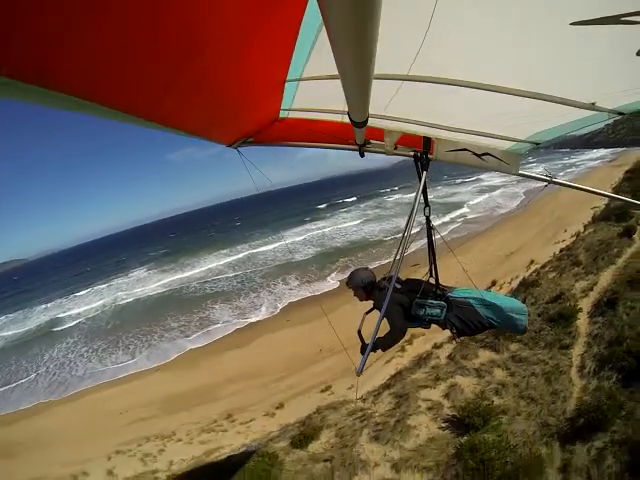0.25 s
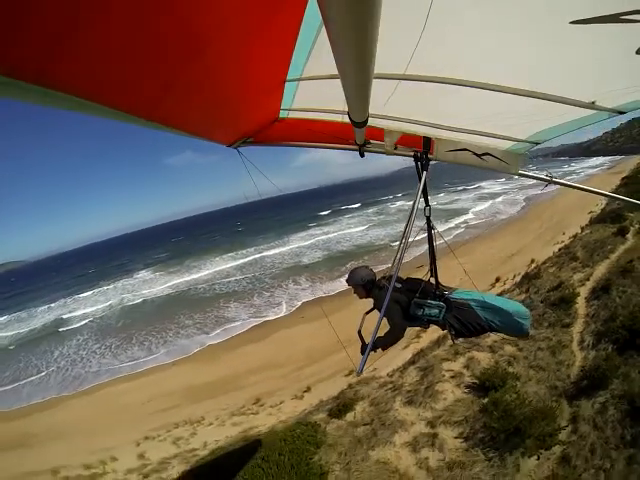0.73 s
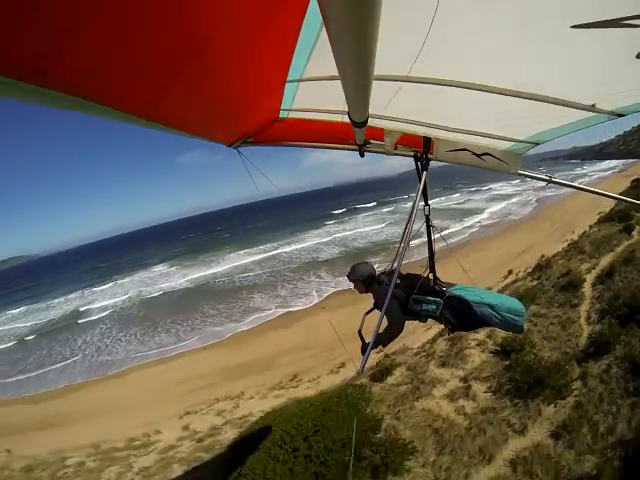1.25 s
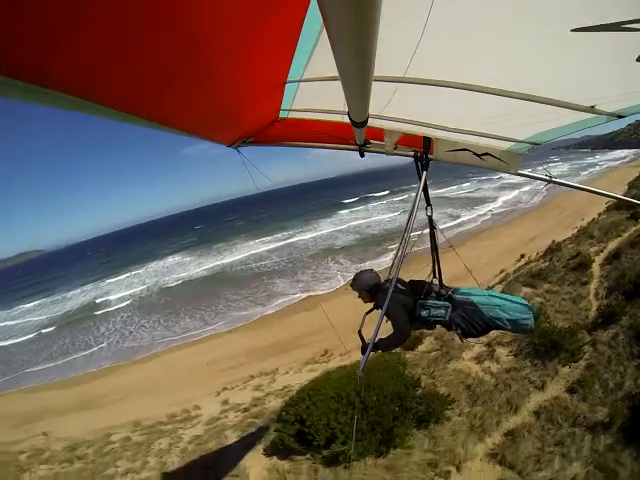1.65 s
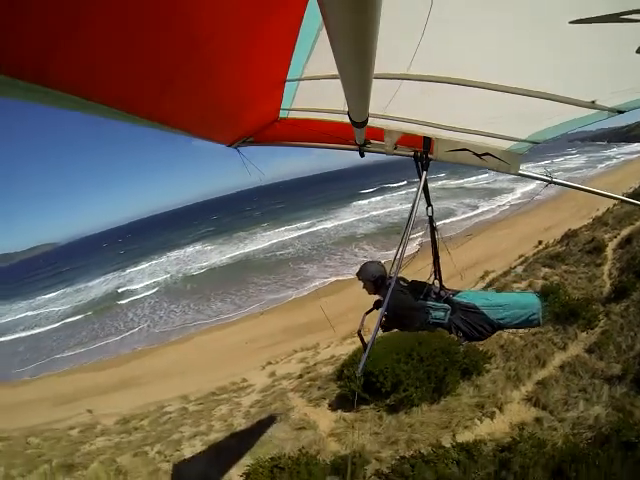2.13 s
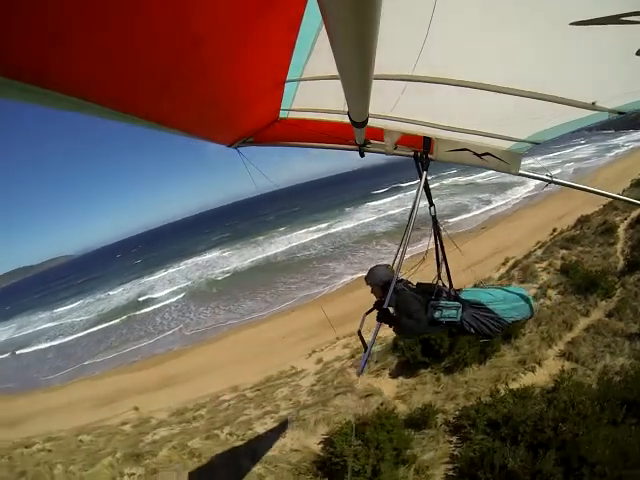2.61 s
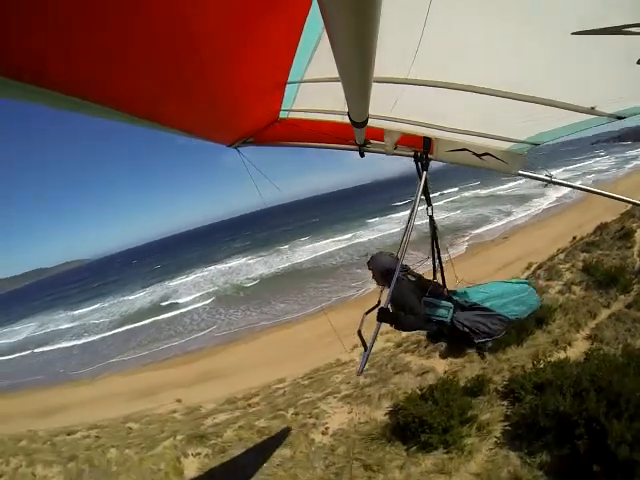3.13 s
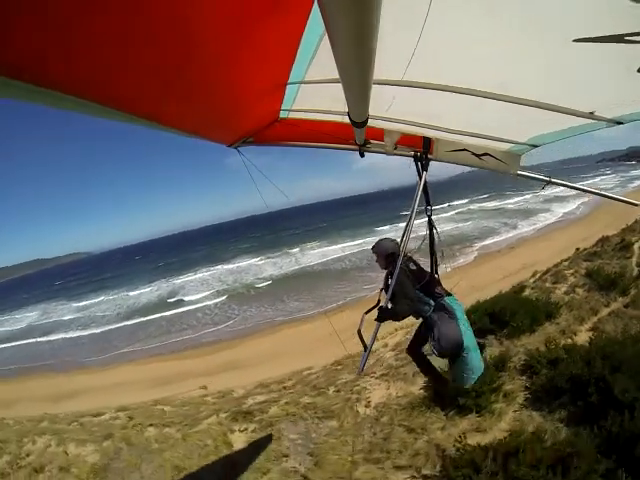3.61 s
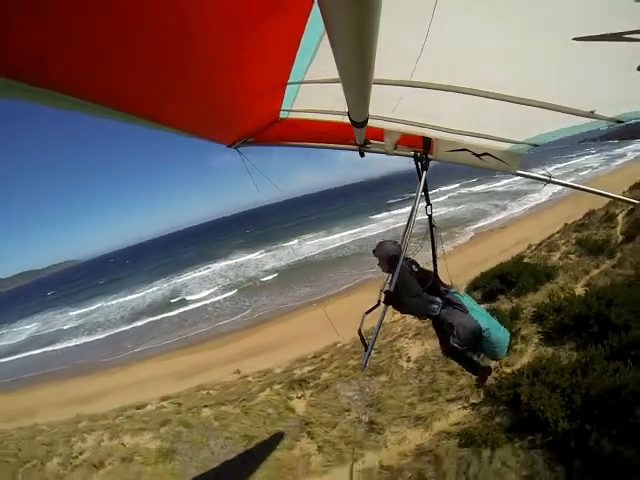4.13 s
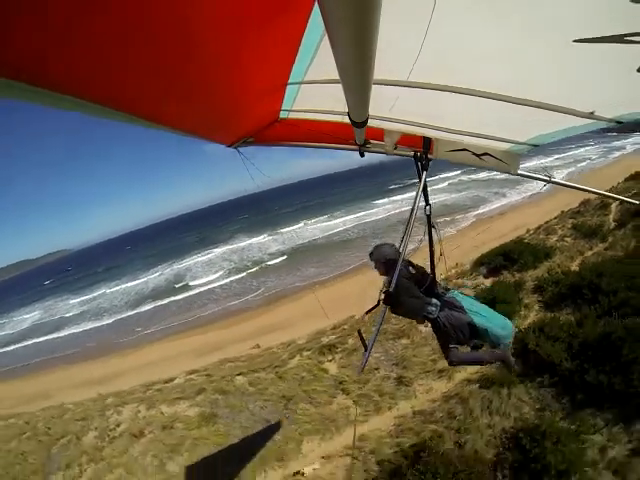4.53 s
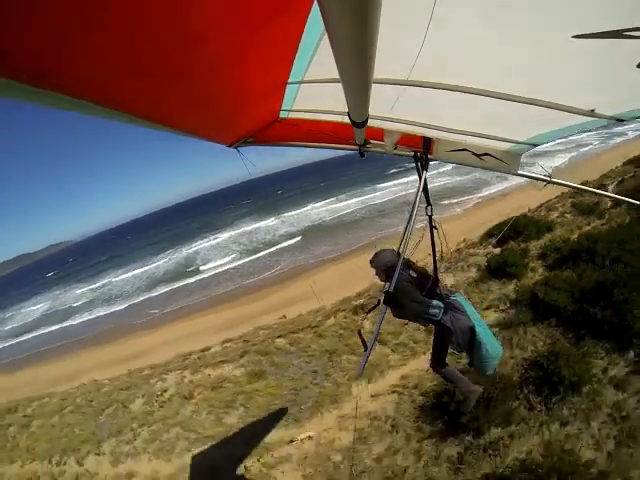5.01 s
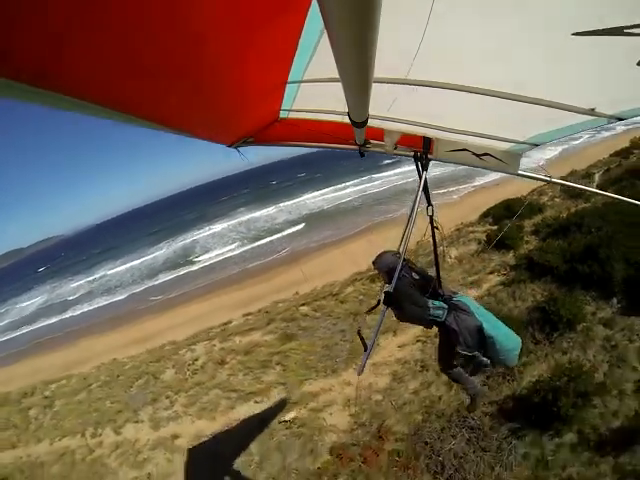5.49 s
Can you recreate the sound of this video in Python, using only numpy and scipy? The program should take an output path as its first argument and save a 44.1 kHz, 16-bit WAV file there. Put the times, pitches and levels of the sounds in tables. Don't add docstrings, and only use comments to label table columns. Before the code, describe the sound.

Close inside a camera housing, deep gusts throb while loose joints knock, creak and rattle in clusters, loudest and most crowded near the end.

```python
import sys
import numpy as np
from scipy import signal
from scipy.fft import rfft, irfft
from scipy.io import wavfile
from scipy.ndimage import uniform_filter1d, minimum_filter1d

SR = 44100
rng = np.random.default_rng(int(sys.argv[2]) if len(sys.argv) > 2 else 0)


def dump_mix(stems):
    frames = np.atleast_2d(stems).T
    limited = np.clip(frames, -1, 1)
    pcm = np.round(limited * 32767).astype(np.int16)
    wavfile.write(sys.argv[1], SR, pcm)


def voltage_ratio(level):
    return 10 ** (np.asarray(level, float) / 20)


N = 253575
TIME = np.arange(N) / SR

# (time [s], length [s], level [dB], pitch [Hz])
SWINGS = [(-.1, 0.42, -9, 57.1), (0.322, .2, -11.5, 58.65), (0.545, 0.41, -12.5, 57.1),
          (1.006, 0.26, -20, 52.5), (1.417, 0.2, -39.5, 57.3), (1.658, .13, -23.5, 59.2),
          (1.825, 0.2, -27, 56.2), (2.019, 0.17, -22, 55.44), (2.271, 0.31, -18, 58.67),
          (2.467, 0.22, -27.5, 58.5), (2.735, 0.22, -18, 59.2), (2.954, 0.18, -16, 55.83),
          (3.117, 0.2, -16, 57.7), (3.408, .26, -18, 57.96), (3.832, 0.34, -14.5, 57.5),
          (4.161, 0.43, -13, 56.22), (4.444, 0.36, -16, 57.1), (4.806, 0.25, -22, 59.3),
          (5.038, 0.44, -17.5, 57.74), (5.45, 0.23, -22, 57.47), (5.616, 0.29, -13, 58.33)]
# (time [s], length [s], level [dB])
HEAVES = [(.36, 0.35, -23.5), (.72, 0.46, -17.5), (1.05, 0.21, -19.5), (1.48, 0.3, -33), (1.88, 0.43, -28),
          (2.25, 0.29, -20), (2.72, 0.28, -18.5), (3.0, 0.29, -17.5), (3.5, 0.44, -27.5),
          (3.95, 0.34, -26.5), (4.27, 0.22, -20), (4.9, 0.3, -24), (5.55, 0.53, -28.5)]
SWING_REST_DB, HEAVE_REST_DB, GUST_EDGE_SHARE = -38, -34.5, 0.31
# (time [s], strength [dB])
AIRFLOW = [(0, -4), (.45, 1), (1.1, 5), (1.4, 0), (2.2, 0.5), (2.6, 2), (3.05, 7), (3.4, -0.5), (3.7, -1.5),
           (4.0, 6), (4.4, -2.5), (4.8, -1.5), (5.75, 0.5)]
FRAME_DB, RUSH_DB, BUZZ_DB = -31.5, -46.5, -75
# (frequency [Hz], width [Hz], level [dB])
FRAME_MODES = [(85, 37, 5), (127, 36, 1.5), (171, 20, 0.5), (204, 28.5, 0), (233.8, 15, -2.5),
               (278, 19.4, 2.5), (369, 15, -15.5)]
# (frequency [Hz], width [Hz], level [dB])
LOW_SHELL = [(436, 10, -18.5), (680.5, 27, 2), (736.3, 17, 4), (835, 17, 1.5), (910, 38, -2),
             (992, 77, -5.5)]
MID_SHELL = [(1241, 21, -6), (1320, 26, -2), (1375, 54, -3), (1480, 33, -1), (1583, 70, -6), (1694, 76, -8),
             (1807, 48, -7), (2020, 130, -17)]
HIGH_SHELL = [(2455, 340, 7.5), (2720, 170, 2.5), (3700, 120, -13)]
# (frequency [Hz], density [dB per Hz])
HISS = [(1500, -10.5), (2200, -5.5), (3000, -5.5), (4000, -15), (5200, -21), (7000, -21), (10000, -26.5),
        (15800, -39.5), (16100, -65.5)]
# (frequency [Hz], width [Hz], level [dB])
HISS_HUMPS = [(3810, 140, 0), (5080, 150, 3.5)]
# (frequency [Hz], level [dB])
BUZZ = [(6443, 9), (12862, 9)]
# (frequency [Hz], level [dB])
WHINE = [(5141, -8), (7741, -8), (7854, -7), (11640, -11), (11760, -11), (15542, -12), (15657, -12)]
BUZZ_RATE_HZ, BUZZ_START_S, BUZZ_DUTY = 47.968, .0041, .37
# (time [s], depth [dB])
DUCKS = [
    (.58, 6.5),
    (1.234, 12.5),
    (1.32, 4.5),
    (1.81, 8.5),
    (3.285, 12.5),
    (3.775, 4),
    (4.46, 7.5),
    (5.04, 9),
    (5.319, 3),
]
DUCK_ATTACK_S, RECOVER_S, QUICK_S, QUICK_SHARE = 0.031, 0.89, 0.06, .3
QUIET_DB = -93
# (time [s], peak [dB])
SNAPS = [(0.105, -52), (0.1154, -55), (0.1606, -53), (0.1659, -51), (0.1848, -51), (1.238, -51),
         (1.2433, -50), (1.2527, -55), (1.2606, -49), (1.264, -50.5), (1.2692, -49.5), (1.325, -44),
         (1.8163, -49), (1.8563, -52.5), (1.8592, -53), (1.8646, -53), (1.8687, -54.5), (1.886, -50.5),
         (3.286, -45.5), (3.289, -47.5), (3.2963, -50), (3.2996, -50.5), (3.3082, -47), (3.311, -47),
         (3.776, -51.5), (4.3356, -45.5), (4.3388, -45.5), (4.462, -50), (4.466, -42), (4.477, -51.5),
         (4.497, -49.5), (5.0353, -52), (5.0428, -47), (5.049, -49), (5.057, -54), (5.0678, -50.5),
         (5.077, -54), (5.092, -50.5), (5.1148, -51), (5.1202, -54), (5.1454, -53.5), (5.3165, -50)]
# (time [s], peak [dB], frequency [Hz], ring [cycles])
THUDS = [(0.579, -22.5, 279.3, 9.7), (1.13, -22, 282.6, 19), (1.812, -23, 269, 8), (2.33, -24.5, 280, 27),
         (2.914, -1, 43.2, 1.1), (3.057, -3, 104.6, 3.05), (3.06, -6, 218, 2.94), (3.778, -27, 290.4, 23),
         (4.351, -14, 290, 5.7), (4.46, -8.5, 82.2, 1.33), (4.464, -17.5, 281.4, 8.3),
         (4.56, -20.5, 283, 5.8), (5.04, -13.5, 273.8, 12.1), (5.32, -20.5, 277.5, 10)]
# (time [s], peak [dB], frequency [Hz], ring
RINGS = [(2.494, -31.5, 2880, 11.7), (4.484, -48, 2580, 54), (.565, -23, 1414, 9.7),
         (2.306, -36, 2720, 6.25), (3.577, -41.5, 2510, 13), (4.63, -43, 1248, 87), (5.171, -42, 920, 40),
         (5.175, -46, 1254, 75), (5.452, -32, 910, 26), (.578, -23.5, 338, 3.5), (4.025, -25, 487, 4.2),
         (4.336, -27, 477, 4.8), (5.036, -21.5, 485, 5.3), (5.07, -19.5, 493, 6.9)]
# (time [s], peak [dB], chatter [Hz], length [ms])
CLAMP_SLIPS = [(1.2407, -3, 1500, 6.6), (1.2494, -1, 1480, 11), (1.2625, -2, 1380, 11.4),
               (1.2743, -7.5, 1345, 11), (1.2873, -17.5, 1270, 7), (1.3151, -3, 1480, 6.9),
               (1.8078, -1.5, 1524, 8), (1.8249, -12.5, 1777, 19), (1.896, -10.5, 1480, 6.2),
               (1.9742, -4.5, 1550, 2.3), (2.3788, -12, 1510, 1.187), (2.917, -20.5, 1507, 18),
               (3.278, 1, 1422, 12.5), (3.5785, -23.5, 1510, 2.46), (3.7749, 0.5, 1528, 5),
               (3.7889, -2, 1663, 1.9), (3.8432, -17, 1336, 4.1), (3.9349, -19.5, 1363, 5.6),
               (4.0258, -4, 1349, 9.8), (4.4126, -3, 1630, 2.07), (4.4165, -4.5, 1403, 5),
               (4.4261, -12.5, 1413, 14.3), (5.0502, -5, 1356, 4.5), (5.0603, -3, 1460, 4.2),
               (5.0685, -4, 1480, 3), (5.0757, 0, 1330, 4.7), (5.0963, -3.5, 1413, 3.1),
               (5.1066, -2, 1316, 10), (5.1389, -3, 1352, 12.4), (5.3146, -5, 1395, 9.8),
               (5.4157, -10.5, 1325, 10), (5.4304, -8.5, 1376, 3)]
# (time [s], peak [dB], chatter [Hz], length [ms])
HINGE_SLIPS = [(.5784, 4, 1494, 2), (.5856, -18, 1300, 3), (1.2326, -7.5, 1366, 4.3),
               (1.838, -20.5, 2020, 25), (1.8516, -7.5, 1635, 9.9), (1.864, -9, 1617, 7.6),
               (1.953, -13.5, 1504, 9.4), (2.9435, -17, 1377, 7.5), (2.3264, 4.5, 1560, 0.96),
               (2.4961, -18, 1390, 5.5), (2.8057, -19, 1415, 6.5), (3.1128, -19, 1390, 14),
               (3.2922, -1, 1450, 7.8), (3.2995, -2.5, 1490, 2.57), (4.187, -31.5, 1440, 6),
               (4.3356, -3.5, 1480, 3.44), (4.4628, 1, 1330, 6.4), (4.4778, -2.5, 1342, 10.3),
               (4.5288, -14, 1418, 5.6), (4.558, -11.5, 1420, 5.5), (4.5733, -13, 1240, 12),
               (4.5859, -13.5, 1386, 9.3), (4.87, -25.5, 1430, 2.3), (5.0218, -18, 1443, 3.5),
               (5.0356, -1, 1305, 12.2), (5.09, 1, 1400, 3.2), (5.1196, -5, 1340, 7.1),
               (5.1278, -6.5, 1385, 6.4), (5.1336, -16, 1475, 3.3), (5.1605, -18.5, 1327, 9.7),
               (5.3292, -7.5, 1375, 7.4), (5.3952, -3, 1436, 4.2), (5.4095, -6.5, 1380, 4.4)]
# (time [s], length [s], first level [dB], last level [dB], chatter [Hz])
CREAKS = [(0.591, 0.11, -24.5, -39.5, 1646), (1.047, 0.18, -28, -17.5, 1524),
          (1.362, 0.051, -13.5, -49, 1320), (1.788, 0.023, -26.5, -17.5, 1450),
          (1.806, 0.069, -33, -18, 1950), (1.985, 0.1, -25, -36.5, 1626), (2.332, 0.1, -39, -32.5, 1480),
          (2.5, 0.28, -50.5, -45, 1430), (2.791, 0.16, -33, -23, 1492), (3.053, 0.13, -26.5, -35.5, 1418),
          (3.333, 0.1, -29, -34, 1426), (3.791, 0.04, -20, -30.5, 1805), (3.831, .025, -23.5, -27, 1399),
          (3.941, 0.03, -30, -41, 1400), (4.05, .065, -28, -34.5, 1302), (4.332, 0.047, -19, -33.5, 1480),
          (4.498, 0.12, -26.5, -28, 1320), (5.035, 0.098, -15.5, -22, 1386),
          (5.157, 0.054, -35, -44.5, 1340), (5.339, 0.054, -28.5, -36, 1460),
          (5.408, 0.044, -20.5, -24.5, 1813), (5.451, 0.037, -35, -47.5, 1500)]
CREAKS_PER_S, CREAK_MS, CREAK_SCATTER_DB, CREAK_DETUNE = 240, 3.85, 1, .04
CLAMP_DB, HINGE_DB, CREAK_DB = (-4.5, -30.5), (-13.5, -30), (-8, -31.5)
# (time [s], peak [dB], frequency [Hz], length [ms])
DRUMS = [(0.5796, -15.5, 804, 3), (1.0561, -22.5, 780, 3.3), (1.1655, -25, 865, 3.1),
         (1.1862, -24, 910, 7.5), (1.2367, -9, 796, 3.5), (1.2447, -5, 765, 4.7), (1.2515, -9, 745, 5.4),
         (1.2588, -13.5, 758, 3.6), (1.2728, -10.5, 698, 9.1), (1.3181, -12, 790, 3.4),
         (1.8099, -11, 730, 7.2), (1.9759, -20, 846, 2.8), (2.3271, -16, 795, 3.7), (2.383, -24, 726, 6.7),
         (2.7875, -27, 804, 4.7), (2.9559, -25, 734, 9.5), (3.2791, -8.5, 854, 2.8),
         (3.2988, -11.5, 755, 11.4), (3.7769, -13.5, 900, 3.3), (3.7845, -27, 692, 9.6),
         (3.794, -17, 996, 3.8), (4.0303, -30.5, 708, 7.84), (4.3366, -22, 772, 4.35),
         (4.4162, -10, 774, 3.87), (4.4245, -13.5, 710, 13), (4.4447, -23.5, 719, 9.8),
         (4.4655, -22.5, 716, 9.5), (5.0361, -18.5, 757, 6.4), (5.052, -25, 890, 4.6),
         (5.0641, -22, 713, 7.8), (5.072, -15.5, 850, 7.4), (5.0935, -21, 773, 4.9),
         (5.0985, -19.5, 761, 3.9), (5.1182, -22, 836, 3.8), (5.1226, -23.5, 847, 11.2),
         (5.1406, -17.5, 722, 4), (5.1486, -22, 764, 3.9), (5.1553, -27.5, 779, 3.7),
         (5.1616, -30, 730, 5.4), (5.317, -18, 808, 1.5), (5.3229, -28, 740, 7.6), (5.3822, -27, 710, 8.9),
         (5.3957, -16.5, 820, 3.36), (5.4026, -20, 713, 7.7), (5.4165, -17, 717, 10),
         (5.4285, -14, 945, 8.6), (5.4385, -15, 710, 9.8)]
# (time [s], peak [dB], length [ms])
PINGS = [(0.5791, -29, 2.9), (1.237, -23.5, 2.6), (1.2481, -24, 3.5), (1.259, -37.5, 6.2),
         (1.2656, -33, 6.9), (1.281, -36, 4.5), (1.3166, -26.5, 3.2), (1.812, -38, 5.0),
         (1.8219, -34.5, 3.7), (1.8321, -43, 9.9), (1.85, -40, 5.2), (1.8586, -31, 5.5), (2.33, -49, 6),
         (2.496, -35.5, 3.7), (3.2781, -30, 3.1), (3.286, -42, 2.3), (3.2922, -42, 2.7), (3.3, -33, 2.9),
         (3.776, -26.5, 3), (3.7891, -36, 8.6), (4.0262, -31.5, 2.1), (4.0324, -44, 2.6),
         (4.337, -33.5, 7.3), (4.4136, -29, 2.9), (4.4663, -28.5, 7.9), (4.4752, -24.5, 6.4),
         (4.532, -30, 5.0), (4.579, -27.5, 5.8), (5.0435, -21, 11), (5.061, -27, 4.5), (5.068, -30.5, 2.8),
         (5.0757, -26, 5.2), (5.0923, -29, 5.0), (5.109, -27, 4.8), (5.1333, -35.5, 3.8),
         (5.14, -36.5, 3.0), (5.151, -36, 3.3), (5.316, -29, 2.8), (5.3225, -42.5, 2.3),
         (5.3943, -33.5, 2.8), (5.4341, -44, 2.7)]
PING_HZ, PING_DETUNE, BEAT_TAIL = 2511, 0.034, 1.7
# (time [s], peak [dB])
TAPS = [
    (1.056, -27),
    (2.786, -30.5),
    (3.223, -30),
    (3.614, -35),
    (5.598, -41),
    (5.639, -32),
    (5.68, -38),
]
# (time [s], pitch [Hz], level [dB])
SQUEAKS = [
    [(1.221, 1486, -28.5), (1.228, 1495, -17.5), (1.234, 1350, -3), (1.239, 1392, -2)],
    [(1.319, 1480, -9), (1.324, 1496, -6.5), (1.33, 1494, -12), (1.354, 1480, -11), (1.362, 1360, -16.5),
     (1.372, 1340, -25.5)],
    [(1.868, 1600, -11), (1.9, 1683, -16), (1.932, 1706, -12.5), (1.945, 1704, -16.5), (1.957, 1604, -17)],
    [(1.976, 1725, -17), (1.995, 1737, -32), (2.02, 1680, -49)],
    [(3.3035, 1483, -6.5), (3.312, 1476, -7.5), (3.35, 1454, -42)],
    [(2.812, 1436, -37.5), (2.87, 1480, -37)],
    [(4.043, 1394, -17), (4.07, 1375, -30.5), (4.09, 1419, -23.5), (4.115, 1320, -46)],
    [(5.335, 1418, -14), (5.355, 1374, -30), (5.385, 1368, -20)],
]
# (time [s], pitch [Hz], level [dB])
LOW_SQUEAKS = [
    [(1.811, 988, -17.5), (1.834, 946, -13.5), (1.847, 1015, -18.5), (1.858, 994, -20), (1.868, 960, -25.5)],
    [(1.862, 850, -15), (1.875, 820, -19.5), (1.898, 825, -18), (1.92, 832, -28.5), (1.934, 850, -35.5)],
]
# (time [s], pitch [Hz], level [dB])
PEEPS = [
    [(4.05, 5370, -91), (4.086, 5440, -53), (4.12, 5110, -85)],
    [(4.412, 5400, -73), (4.42, 5557, -54), (4.44, 5500, -85)],
]
# (time [s], peak [dB])
TICKS = [
    (1.324, -31.5),
    (2.325, -42.5),
    (2.4936, -33.5),
    (3.062, -46),
    (3.089, -42),
    (3.311, -32.5),
    (3.5744, -49),
    (4.332, -34.5),
    (4.46, -40.5),
    (4.4962, -54),
]


def unit(x):
    return x / np.sqrt(np.mean(x ** 2))


def curves(table):
    s, *columns = np.transpose(table)
    return [np.interp(TIME, s, c) for c in columns]


def impulses(table):
    kick = np.zeros(N)
    s, db = np.transpose(table)
    kick[(s * SR).astype(int)] = voltage_ratio(db)
    return kick


def ring(x, modes):
    return sum((-1) ** k * voltage_ratio(db) * signal.lfilter(*signal.iirpeak(hz, hz / width, SR), x)
               for k, (hz, width, db) in enumerate(modes))


def band(x, lo_hz, hi_hz):
    return signal.sosfilt(signal.butter(2, [lo_hz, hi_hz], "band", fs=SR, output="sos"), x)


def walls(x):
    return signal.sosfilt(signal.butter(4, 2700, fs=SR, output="sos"), x)


def walk(rate):
    k = int(SR / rate)
    held = np.repeat(rng.standard_normal(N // k + 1), k)
    return 1.18 * uniform_filter1d(uniform_filter1d(held, k), k)[:N]


def eddies(rate, spread_db):
    sizes = voltage_ratio(spread_db * rng.exponential(size=N)) * rng.standard_normal(N)
    pushes = (rng.random(N) < rate / SR) * sizes
    return unit(pushes) + 0.69 * rng.standard_normal(N)


def tone(hz, wobble, overtone_db, start=0.):
    phase = start + 2 * np.pi * np.cumsum(hz * (1 + wobble)) / SR
    overtones = np.sin(2 * phase) + .3 * np.sin(3 * phase) + .15 * np.sin(4 * phase)
    return np.sqrt(2) * (np.sin(phase) + voltage_ratio(overtone_db) * overtones)


def gain_control():
    db, coarse = 0, TIME[::64]
    for s, depth_db in DUCKS:
        t = np.maximum(coarse - s, 0)
        recovery = np.exp(-t / RECOVER_S) + QUICK_SHARE * np.exp(-t / QUICK_S)
        db = db - depth_db * (1 - np.exp(-t / DUCK_ATTACK_S)) * recovery
    return np.interp(TIME, coarse, db)


def noise_floor_db():
    return np.maximum(BUZZ_DB + gain_control(), QUIET_DB)


def gusts(rows, rest_db):
    t = TIME[::64]
    power = voltage_ratio(2 * rest_db)
    for s, length, db, *_ in rows:
        edge = np.clip(np.minimum(t - s, s + length - t) / (GUST_EDGE_SHARE * length), 0, 1)
        power = power + (voltage_ratio(db) * np.sin(np.pi / 2 * edge)) ** 2
    return np.interp(TIME, t, np.sqrt(power))


def boom():
    s, length, _, hz = np.transpose(SWINGS)
    pitch = np.interp(TIME, s + length / 2, hz)
    swing = tone(pitch, .012 * walk(22), -32, start=-.65) * voltage_ratio(.8 * walk(15))
    buffet = unit(band(band(rng.standard_normal(N), 17, 30), 16, 72))
    churn = unit(band(band(rng.standard_normal(N), 44, 88), 30, 100))
    heave = (buffet + voltage_ratio(-9) * churn) * gusts(HEAVES, HEAVE_REST_DB)
    return swing * gusts(SWINGS, SWING_REST_DB) + heave


def wind():
    gain_db, (flow_db,) = gain_control(), curves(AIRFLOW)
    frame_db = FRAME_DB + 0.75 * gain_db + flow_db
    rush_db = RUSH_DB + 0.75 * gain_db + flow_db
    gust = walk(12)
    frame = unit(ring(eddies(600, 1.2), FRAME_MODES)) * voltage_ratio(frame_db + 2.4 + .9 * gust + 1.2 * walk(25))

    push = eddies(1500, 2.2)
    shell = ring(push, MID_SHELL) + voltage_ratio(-5.0) * ring(push, LOW_SHELL) + voltage_ratio(-33.5) * ring(push, HIGH_SHELL)
    shell += voltage_ratio(-6.5) * band(push, 430, 550) + voltage_ratio(-18.0) * band(push, 1200, 1220)
    rush = unit(walls(shell)) * voltage_ratio(rush_db + 3.0 + 0.46 * gust + walk(27))

    hz, db = np.transpose(HISS)
    colour = voltage_ratio(np.interp(np.log(np.fft.rfftfreq(N, 1 / SR) + 1), np.log(hz), db))
    hiss = unit(irfft(rfft(eddies(20000, .5)) * colour, N))
    hiss = hiss * voltage_ratio(0.81 * noise_floor_db() + 0.39 * flow_db + 3.0 + 0.7 * gust)
    return frame + rush + hiss + sum(ring(hiss, [hump]) for hump in HISS_HUMPS)


def switch():
    return uniform_filter1d(1. * ((TIME - BUZZ_START_S) * BUZZ_RATE_HZ % 1 < BUZZ_DUTY), size=30)


def electrical_tones(lines):
    return sum(voltage_ratio(db) * tone(np.full(N, 1. * hz), .002 * walk(60), -90) for hz, db in lines)


def buzz():
    cycle = (TIME - BUZZ_START_S) * BUZZ_RATE_HZ
    burst_gain = voltage_ratio(1.8 * rng.standard_normal(int(cycle[-1]) + 3))
    uneven = burst_gain[np.floor(cycle).astype(int) + 1]
    gated = electrical_tones(BUZZ) * switch() * uneven
    steady = electrical_tones(WHINE) * voltage_ratio(2.2 * walk(7.3) - 2)
    return (gated + steady) * voltage_ratio(noise_floor_db())


def fizz():
    return switch() * band(rng.standard_normal(N), 12700, 13700) * voltage_ratio(3.0 + noise_floor_db())


def snaps():
    return voltage_ratio(20.5) * band(band(impulses(SNAPS), 2600, 6000), 2000, 12000)


def thuds():
    out = np.zeros(N + SR)
    t = np.arange(SR // 2) / SR
    for s, db, hz, cycles in [*THUDS, *RINGS]:
        i = int(s * SR)
        shape = np.exp(-t * hz / cycles) * (1 - np.exp(-(t / 0.003) ** 2))
        out[i:i + len(t)] += voltage_ratio(db) * np.sin(2 * np.pi * hz * t) * shape
    return out[:N]


def slip_rows():
    rows = []
    for table, colour in ((CLAMP_SLIPS, CLAMP_DB), (HINGE_SLIPS, HINGE_DB)):
        rows += [tuple(row) + colour for row in table]
    chance = rng.standard_normal(size=(len(CREAKS), 3, 80))
    for (s, length, first_db, last_db, hz), (gap, size, pitch) in zip(CREAKS, chance):
        times = np.cumsum(np.exp(.6 * gap)) / CREAKS_PER_S
        for t, a, p in zip(times, size, pitch):
            if t < length:
                db = first_db + (last_db - first_db) * t / length + CREAK_SCATTER_DB * a
                rows.append((s + t, db, hz * (1 + CREAK_DETUNE * p), CREAK_MS) + CREAK_DB)
    return rows


def slips():
    chatter, kick, low, high, grit = np.zeros((5, N + SR))
    t = np.arange(SR // 20) / SR
    rows = slip_rows()
    chance = rng.random(size=(1400, 3))
    for (s, db, hz, ms, low_db, high_db), (turn, tilt, bright) in zip(rows, chance):
        i = int((s - .0015) * SR)
        span = slice(i, i + len(t))
        attack = 1 - np.exp(-(t / (0.0011 + 0.00017 * abs(ms))) ** 2)
        shape = attack * np.exp(-(t / (abs(ms) * 0.00098)) ** 1.54)
        cycles = hz * t * (1 - 0.16 * (tilt - .5) * t) + turn
        chatter[span] += voltage_ratio(db + 0.28) * shape * np.sin(2 * np.pi * cycles)
        kick[i + 50] += voltage_ratio(db)
        low[i + 30] += voltage_ratio(db + low_db)
        high[span] += voltage_ratio(db + high_db + 6.7 * bright) * shape * np.exp(-t / 0.012)
        grit[span] += voltage_ratio(db) * shape
    chatter, low, high = chatter[:N], low[:N], high[:N]
    kick = signal.lfilter(*signal.butter(2, 2200, fs=SR), kick[:N])
    creep = signal.lfilter([1 / 200], [1, -np.exp(-1 / (0.012 * SR))], grit[::-1])[::-1]
    grit = (grit + voltage_ratio(-16.5) * creep)[:N] * eddies(3000, 1.1)

    shell = voltage_ratio(22.5) * ring(kick, MID_SHELL) + voltage_ratio(-7.0) * ring(chatter, MID_SHELL)
    shell += voltage_ratio(3.5) * ring(grit, MID_SHELL)
    shell += voltage_ratio(30.5) * ring(band(low, 350, 1700), LOW_SHELL) + voltage_ratio(-2.5) * ring(grit, LOW_SHELL)
    shell += voltage_ratio(10.5) * ring(high * rng.standard_normal(N), HIGH_SHELL)
    frame = voltage_ratio(22.5) * ring(kick, FRAME_MODES[3:]) + voltage_ratio(-12.0) * ring(grit, FRAME_MODES[3:])
    frame += voltage_ratio(5) * band(kick, 455, 515)
    crack = voltage_ratio(-49.0) * band(band(grit, 3100, 5700), 2400, 6900)
    return crack + walls(chatter + shell + frame)


def beats():
    out = np.zeros(N + SR)
    t = np.arange(-SR // 50, SR // 20) / SR
    chance = rng.standard_normal(size=(120, 2))
    pings = [(s, db - 0.5, PING_HZ * (1 + PING_DETUNE * c), ms)
             for (s, db, ms), c in zip(PINGS, chance[:, 0])]
    steepness = np.where(t < 0, 2 * BEAT_TAIL, BEAT_TAIL)
    for (s, db, hz, ms), turn in zip([*DRUMS, *pings], chance[:, 1]):
        i = int(s * SR) - SR // 50
        shape = np.exp(-np.abs(t / (abs(ms) * 0.00076)) ** steepness)
        out[i:i + len(t)] += voltage_ratio(db - 3.5) * shape * np.sin(2 * np.pi * (hz * t + turn))
    return out[:N]


def taps():
    kick = impulses(TAPS)
    return walls(voltage_ratio(40) * ring(kick, LOW_SHELL) + voltage_ratio(33.5) * ring(kick, MID_SHELL))


def squeaks(tables, overtone_db, rough=1):
    out = np.zeros(N)
    rasp = voltage_ratio(overtone_db - 6.5) * band(rng.standard_normal(N), 2200, 6500)
    flutter_db, wobble = .9 * walk(130), .004 * walk(150)
    for table in tables:
        rubbing = (TIME > table[0][0]) & (TIME < table[-1][0])
        on = uniform_filter1d(1. * rubbing, size=200)
        span = on > 1e-9
        hz, db = (c[span] for c in curves(table))
        voice = tone(hz, rough * wobble[span], overtone_db) + rasp[span]
        out[span] += on[span] * voltage_ratio(db + rough * flutter_db[span]) * voice
    return out


def ticks():
    burst = signal.lfilter([1], [1, -np.exp(-1 / (0.002 * SR))], impulses(TICKS))
    return voltage_ratio(-3.0) * band(band(burst * rng.standard_normal(N), 2300, 5300), 1900, 8500)


def scene():
    air = boom() + wind()
    electrical = buzz() + fizz()
    knocks = snaps() + thuds() + slips() + beats() + taps() + ticks()
    low_squeaks = walls(squeaks(LOW_SQUEAKS, -12.0, rough=3.1))
    rubbing = squeaks(SQUEAKS, -48) + low_squeaks + squeaks(PEEPS, -68)
    return (air + electrical + knocks + rubbing)[None]


def low_pass(x):
    return signal.sosfilt(signal.butter(12, 17100, fs=SR, output="sos"), x)


def record(dry):
    room = minimum_filter1d(np.minimum(1, .93 / (np.abs(dry) + 1e-9)), size=301)
    gain = uniform_filter1d(uniform_filter1d(room, size=150), size=150)
    return low_pass(dry * gain)


dry = scene()
out = record(dry)
dump_mix(out)
```